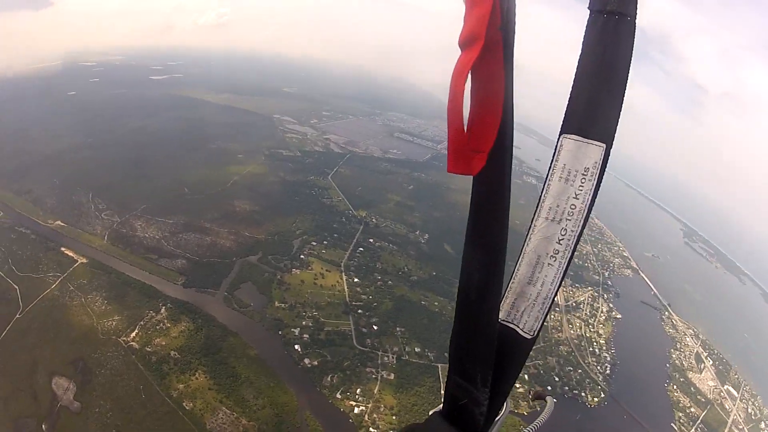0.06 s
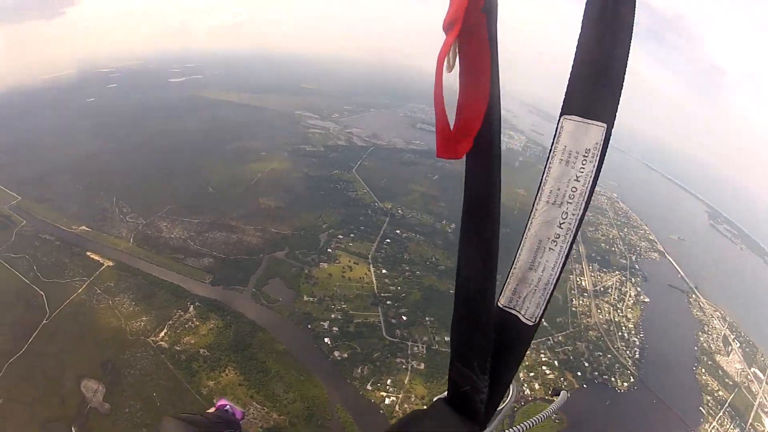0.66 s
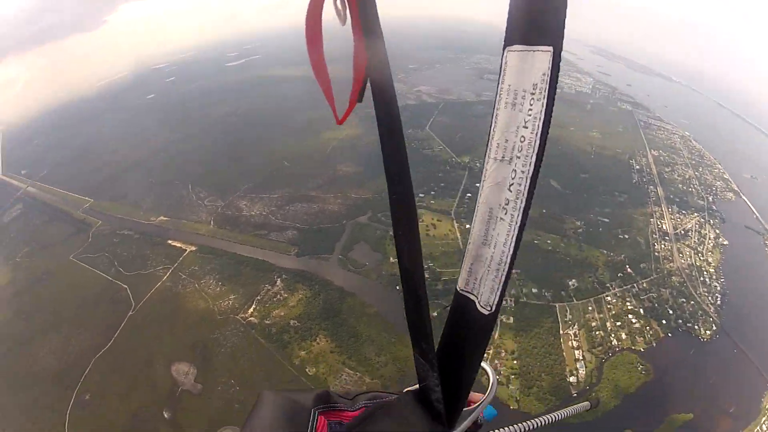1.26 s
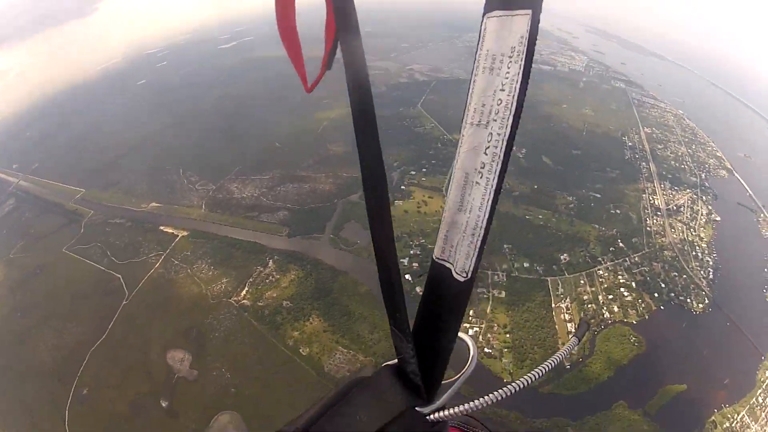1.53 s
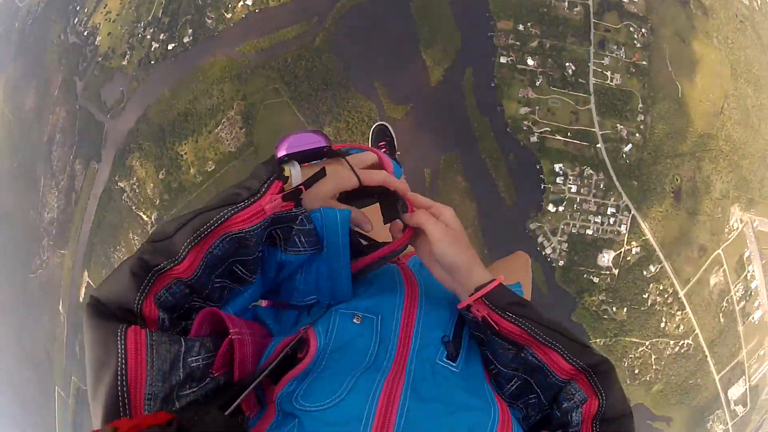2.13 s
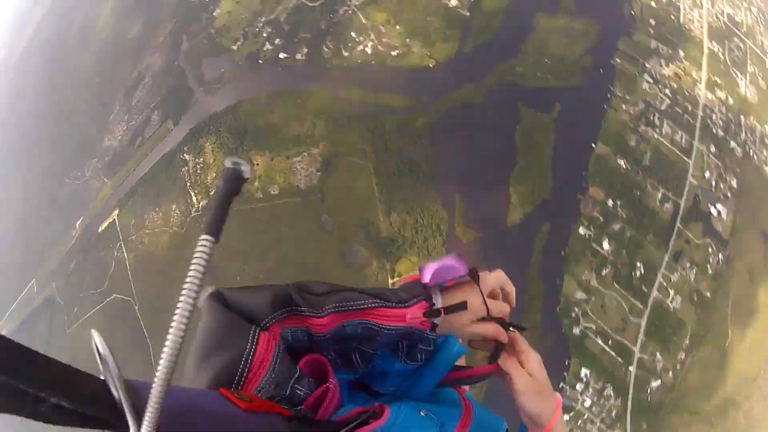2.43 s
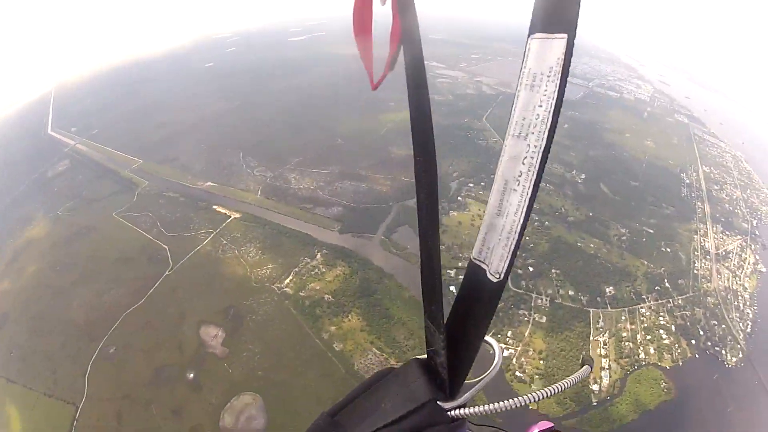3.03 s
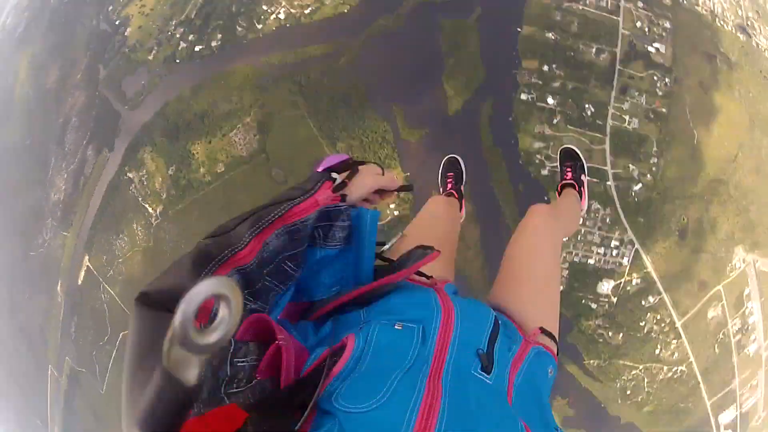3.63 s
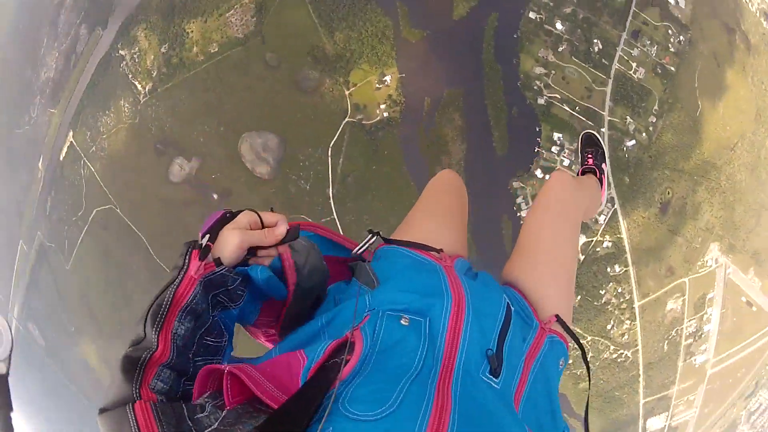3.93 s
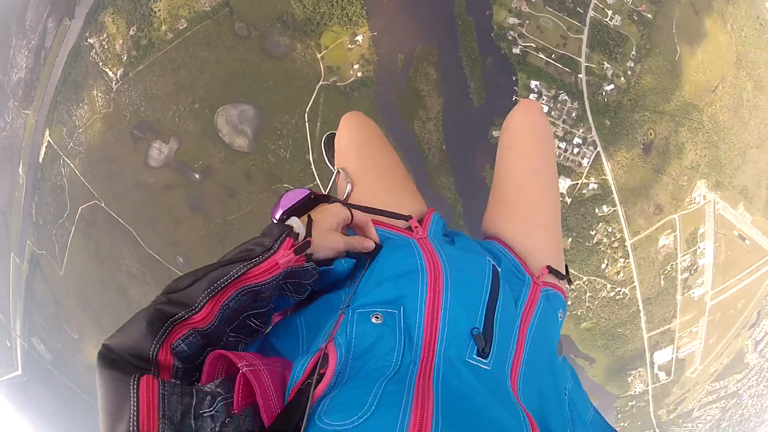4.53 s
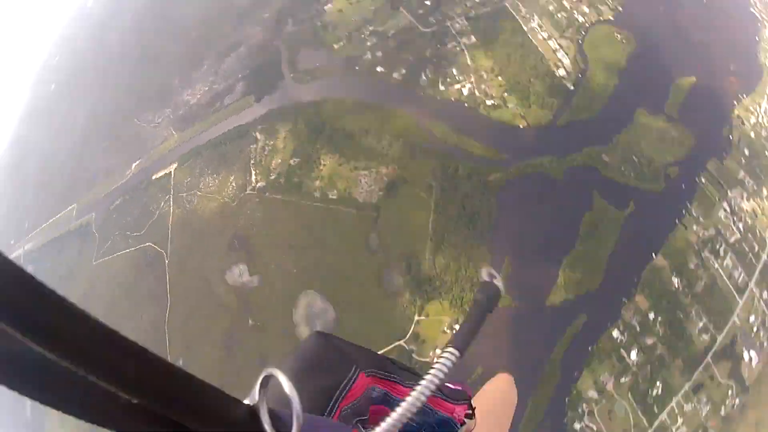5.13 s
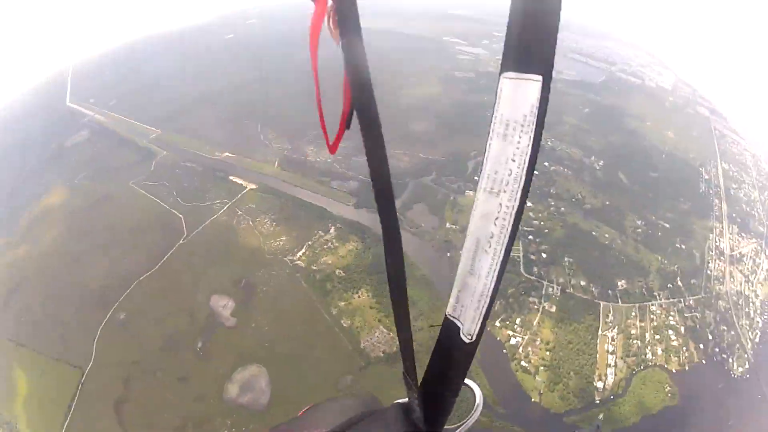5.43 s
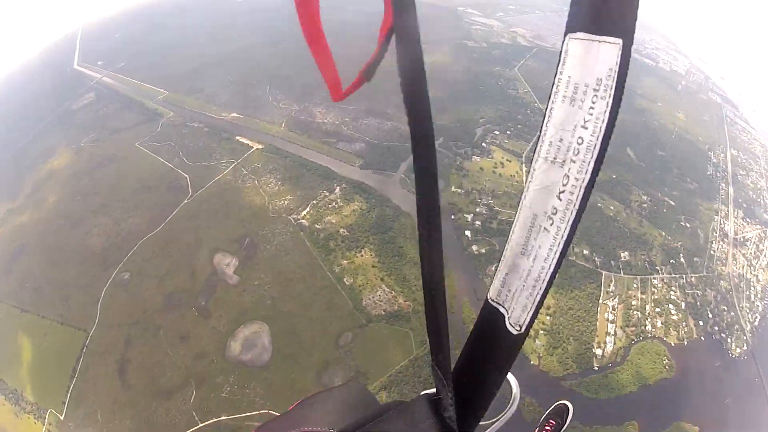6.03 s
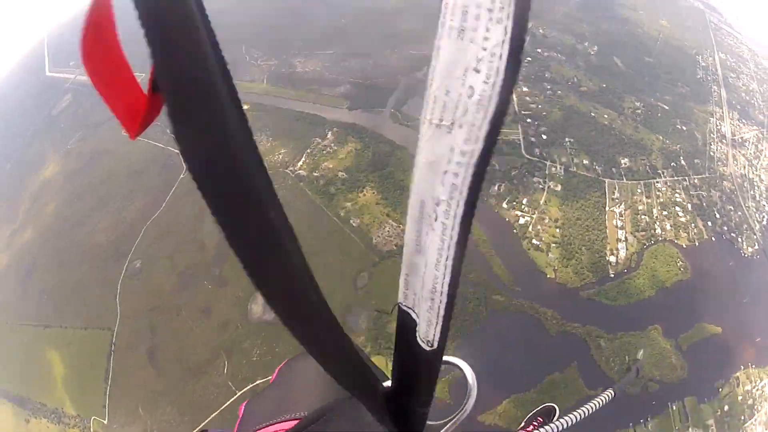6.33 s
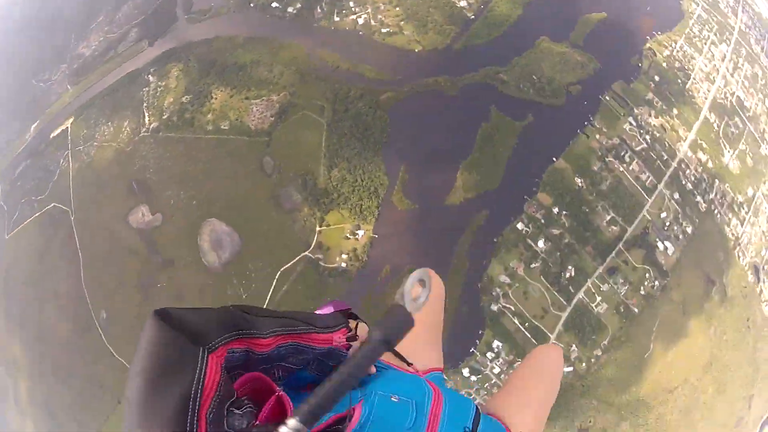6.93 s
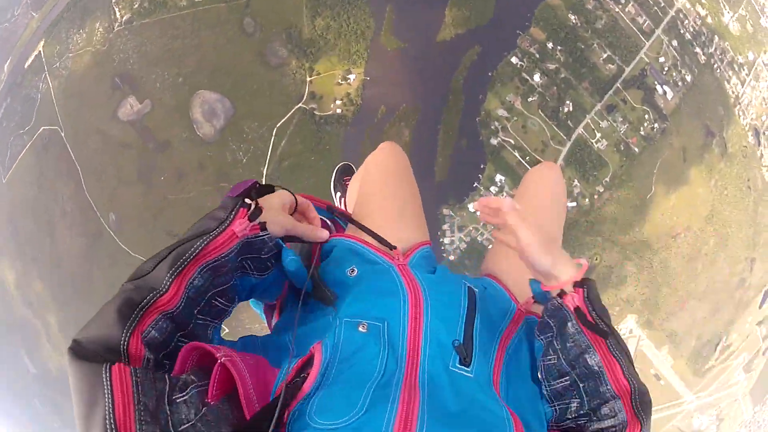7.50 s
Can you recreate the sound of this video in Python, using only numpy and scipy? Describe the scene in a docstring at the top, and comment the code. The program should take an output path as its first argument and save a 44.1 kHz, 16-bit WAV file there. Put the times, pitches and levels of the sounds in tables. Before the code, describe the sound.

Rushing air and rustling cloth during a parachute glide, with webbing scrapes, small metal clicks, plastic knocks and low buffeting gusts.

```python
"""Gliding under a parachute, heard from inside the plastic case of a helmet camera.
At first air rushes over the case, cloth rustles in the flow and gusts rumble underneath.
From 1.6 s the head moves: riser webbing scuffs the helmet and small metal parts click now and then.
From 4.3 s harness hardware knocks on the helmet, rattling the case and rocking it on its mount.
Big eddies buffet the helmet from 5.7 to 6.6 s; a few last knocks and low thumps follow."""
import sys
import numpy as np
from scipy import signal
from scipy.fft import rfft, irfft
from scipy.io import wavfile
from scipy.ndimage import uniform_filter1d, map_coordinates

SR = 44100
rng = np.random.default_rng(int(sys.argv[2]) if len(sys.argv) > 2 else 0)


def materialize(psi):
    """Save the field psi as 16-bit PCM at rate SR to the path in sys.argv[1].

    A 1-D psi becomes a single channel; in a 2-D psi each row is a channel.
    """
    bounded = np.clip(np.atleast_2d(psi).T, -1, 1)
    quanta = np.round(bounded * 32767).astype(np.int16)
    wavfile.write(sys.argv[1], SR, quanta)


N = 342216
HIT_SIZE = 8192  # samples in a one-shot
TIME = np.arange(N) / SR
AGE = np.arange(HIT_SIZE) / SR

# airflow, strong with the head up beside the risers, weak looking down: (time [s], level [dB])
AIRFLOW = [(0.0, -47), (0.15, -49.5), (0.39, -50), (0.84, -48.5), (1.1, -47.5), (1.42, -53), (1.9, -48),
           (2.12, -54.5), (2.4, -53), (2.68, -45), (3.46, -48), (3.76, -53), (4.06, -52), (4.28, -47.5),
           (4.47, -54.5), (4.65, -54.5), (5.14, -53), (5.3, -50.5), (5.86, -46), (5.94, -46.5),
           (6.35, -44.5), (7.76, -54)]
# treble that the case walls let through: (frequency [Hz], gain [dB])
WALL_EQ = [(5700, 0), (6050, -11), (6400, 1), (7700, 3.5), (8600, 10.5), (9400, 12), (10100, 18.5),
           (10900, 7), (11500, 2), (12600, -44), (13200, 12), (14000, 16.5), (15000, 6), (15600, 1)]


def buffeting(calm_db=-42, churn_db=2, swell_s=0.0047, throb_db=-9.5):
    """Turbulence rumbles in the case; each large eddy pushes it through a few slow swings."""
    # gusts swelling around the helmet: (middle [s], length [s], level [dB])
    gusts = [(.45, .6, -41), (1.8, 0.28, -34), (2.4, 0.065, -32.5), (3.05, 1.84, -43), (3.72, 0.42, -32),
             (4.7, .85, -34.5), (5.78, 0.32, -29), (6.33, 0.98, -25.5), (6.73, 0.11, -24.5),
             (6.9, 0.31, -35), (7.23, 0.11, -33.5), (7.62, 1.1, -36)]
    # large eddies hitting the case: (time [s], peak [dB], pitch [Hz])
    eddies = [(5.727, -20, 137), (5.791, -15.5, 76.6), (6.065, -14, 81), (6.209, -14, 117),
              (6.242, -11, 99.4), (6.355, -9, 73), (6.386, -2.5, 74.6), (6.504, -7, 117.4), (6.533, -9, 91),
              (6.568, -13.5, 122)]
    # tone of the rumble: (frequency [Hz], gain [dB])
    rumble_eq = [(15, -17), (30, -2.5), (50, -9), (70, 1), (95, -7), (130, -1.5), (160, -9.5), (200, -17.5),
                 (300, -30), (600, -36), (2000, -84)]
    gust_db = swells(gusts, calm_db)
    rumble = unit(colour(rng.standard_normal(N), rumble_eq)) * undb(gust_db + churn_db * walk(20))
    push = (AGE / swell_s) ** 2 * np.exp(-AGE / swell_s)
    for s, db, hz in eddies:
        add(rumble, s, peak(push * np.sin(2 * np.pi * hz * AGE), db))
    # the slowest pressure swings leak out of the case, leaving only a faint deep throb
    throb = unit(cut(rng.standard_normal(N), 41, "lowpass")) * undb(gust_db + throb_db)
    return cut(rumble, 35, "highpass") + throb


def knocks(chatter_db=-6, chatter_s=0.0024, rattle_db=-26, rattle_s=0.022, ring_db=-29, tick_db=-6.5):
    """Hardware hits the helmet, chatters for a few ms, rings the case and leaves it rattling briefly."""
    out = np.zeros(N)
    chatter = undb(chatter_db) * np.exp(-AGE / chatter_s) + undb(rattle_db) * np.exp(-AGE / rattle_s)
    for s, low_db, high_db in contacts():
        force = chatter * grains(HIT_SIZE, per_s=9000, spread_db=3)
        force[0] += 1  # the blow itself
        # tone of a hard knock: (frequency [Hz], gain [dB])
        knock_eq = [(100, -2), (450, -11.5), (650, -4.5), (900, 4.5), (2000, -7), (3200, -7), (4200, -30.5),
                    (7000, -30), (10000, -26), (16000, -26)]
        body = through_walls(ring_case(force, ring_db), knock_eq)
        # the hardness of the contact sets the share of low modes, high modes and tick
        low = burst(cut(body, 1380, "lowpass"), low_db)
        high = burst(cut(body, [1450, 4200], "bandpass"), high_db)
        tick = burst(cut(body, 4200, "highpass"), high_db + tick_db)
        add(out, s, low + high + tick)
    return out


def contacts(bounce_s=0.0106, bounce_spread=1.42, bounce_db=-14):
    """Each blow of the hardware; the hardest ones bounce softly at widening gaps."""
    # blows on the helmet: (time [s], low modes [dB], high modes [dB], bouncing time [s])
    blows = [(4.2963, -15, -20.5, .06), (4.7461, -22.5, -25.5, 0), (4.776, -16, -20, .06),
             (4.9051, -37.5, -35, 0), (5.1406, -30, -21.5, 0), (5.147, -31.5, -27, 0),
             (6.841, -30.5, -25.5, 0), (6.8445, -23, -20, 0), (7.542, -24.5, -30.5, 0)]
    for s, low_db, high_db, bouncing_s in blows:
        yield s, low_db, high_db
        for delay in bounce_s * np.arange(1, 6) ** bounce_spread:
            if delay < bouncing_s:
                yield s + delay, low_db + bounce_db, high_db + bounce_db


def ring_case(force, ring_db, scatter_db=1, detune=0.012):
    """A contact plus the case's ring; each point of contact loads and excites the modes its own way."""
    # modes of the case and mount: (frequency [Hz], t60 [s], relative level [dB])
    modes = [(634, 0.075, -10.5), (750, 0.022, -9), (863, 0.033, -3), (1040, 0.014, -7),
             (1153, 0.049, -5.5), (1246, 0.069, -13), (1645, 0.028, -2), (1920, 0.025, 6), (2066, 0.019, 4),
             (2310, 0.026, -4), (2400, 0.034, -22), (2940, 0.037, -4), (3060, 0.018, -26), (3690, 0.031, 2)]
    hz, t60, mode_db = np.transpose(modes)[:, :, None]
    load, share = rng.standard_normal((2, len(hz), 1))
    fade = undb(mode_db + scatter_db * share) * np.exp(-np.log(1000) * AGE / t60)
    ring = np.sum(fade * np.cos(2 * np.pi * hz * (1 + detune * load) * AGE), axis=0)
    return force + undb(ring_db) * signal.fftconvolve(force, ring)[:HIT_SIZE]


def thumps(rise_s=0.0029, decay_s=0.014):
    """The camera's mass swings on its springy mount and settles."""
    # jolts of the mount: (time [s], peak [dB], pitch [Hz])
    jolts = [(4.298, -16, 110), (4.325, -22.5, 124), (4.746, -13, 125), (4.783, -16.5, 113),
             (5.155, -24, 83.4), (6.855, -29, 94), (7.543, -14, 129), (7.725, -11, 88), (7.742, -11, 85)]
    out = np.zeros(N)
    envelope = (1 - np.exp(-AGE / rise_s)) * np.exp(-AGE / decay_s)
    for s, db, hz in jolts:
        add(out, s, peak(envelope * np.sin(2 * np.pi * hz * AGE), db))
    return out


def scuffs(scrape_trim_db=1.4, thud_trim_db=0.5, rise_share=0.36, drag_db=-22, drag_s=0.03):
    """Webbing lets go and drags its weave over the shell in tiny slips; the shortest scuffs snap."""
    # strongest scuffs, before the trims: (time [s], level [dB], thud offset [dB], slip decay [s])
    strong_scuffs = [(1.731, -34, -4.5, 0.013), (1.888, -36.5, -2, 0.0079), (2.085, -34.5, -12, 0.016),
                     (2.109, -34.5, -20, .0045), (2.4538, -40.5, -32, .0023), (2.4756, -29.5, -7, 0.0036),
                     (2.641, -30, 0, 0.01), (2.833, -36, -1.5, .007), (2.857, -28, -6, 0.0085),
                     (3.083, -25.5, -4.5, 0.015), (3.286, -29.5, 2, 0.0084), (3.421, -33.5, -5.5, 0.013),
                     (3.589, -37.5, 4.5, .008), (3.661, -35, -2, 0.011), (4.109, -36, -17, 0.0054),
                     (4.391, -39.5, -3.5, .009), (5.028, -36.5, -14, 0.0063), (5.218, -34.5, 2, .006),
                     (5.236, -36.5, -3, 0.0075), (5.4279, -26, -8, 0.0011), (5.59, -20, -4.5, 0.0032),
                     (5.742, -34, 2.5, 0.0076), (5.899, -30.5, -2, .005), (6.037, -30, -3, 0.0022),
                     (6.187, -27.5, 2.5, 0.0018), (6.335, -29.5, -4, 0.019), (6.499, -32, -5, 0.001),
                     (6.807, -29, -1.5, 0.0033), (6.876, -32.5, -7, 0.0071), (6.967, -33.5, -2.5, .007),
                     (6.9911, -26.5, -2.5, 0.003), (7.314, -38, -3.5, 0.015), (7.471, -34, -3, 0.0031),
                     (7.603, -35, -6.5, .005), (7.715, -33, 7, 0.023), (7.729, -28, -14, 0.0025)]
    # tone of the scrape: (frequency [Hz], gain [dB])
    scrape_eq = [(300, -2), (900, 2.5), (1450, 0.5), (1900, 9), (2400, 3.5), (3300, -3.5), (4300, -10),
                 (7000, -18), (16000, -19.5)]
    out = np.zeros(N)
    for s, db, thud_db, decay_s in strong_scuffs + light_scuffs():
        attack = 1 - np.exp(-AGE / (rise_share * decay_s))
        release = np.exp(-AGE / decay_s) + undb(drag_db) * np.exp(-AGE / drag_s)
        force = attack * release * grains(HIT_SIZE, per_s=6000, spread_db=3.15)
        scrape = through_walls(ring_case(force, ring_db=-38), scrape_eq)
        thud = strap_thud(force, s)
        add(out, s, burst(scrape, db + scrape_trim_db) + burst(thud, db + thud_db + thud_trim_db))
    return out


def light_scuffs(start_s=1.6, per_s=4, over_cloth_db=5.5, scatter_db=1, thud_db=0.5, decay_s=0.0094):
    """Once the head moves, webbing brushes it at uneven intervals, harder when the cloth is loud."""
    gap, softness = rng.random((60, 2)).T
    times = start_s + np.cumsum(2 * gap) / per_s
    levels = np.interp(times, TIME, cloth_level()) + over_cloth_db - scatter_db * (2 * softness - 1)
    return [(s, db, thud_db, decay_s) for s, db in zip(times, levels) if s < TIME[-1]]


def strap_thud(force, s, base_hz=482, octaves_per_db=0.09, scatter=0.24):
    """The taut strap thuds; looking down, out of the airflow, pulls it tighter and raises its pitch."""
    # body of the thud: (frequency [Hz], gain [dB])
    thud_eq = [(80, -5.5), (220, -1.5), (340, -4.5), (480, -9), (700, -2.5), (1000, -15.5), (1600, -25),
               (5000, -100)]
    flow_db = curve(AIRFLOW)
    shelter_db = flow_db.mean() - np.interp(s, TIME, flow_db)
    hz = base_hz * 2 ** (octaves_per_db * shelter_db) * np.exp(scatter * rng.standard_normal())
    return colour(force + 2 * band(force, hz, width_hz=220), thud_eq)


def rustle(trim_db=-0.5, flutter_db=1.5, crinkle_db=-11, patchy_db=3, swish_db=-7,
           echo_gain=0.35, echo_s=0.001303, sway_s=0.000212):
    """Cloth hisses in the flow, with patches of tiny crinkles; it brightens as it slides faster."""
    # tone of the cloth: (frequency [Hz], gain [dB])
    cloth_eq = [(100, -2), (350, -4.5), (700, -8.5), (1400, -5.5), (1900, 4.5), (2300, 1.5), (2800, -7.5),
                (3500, -11), (4300, -18), (7000, -24.5), (16000, -26.5)]
    cloth_db = cloth_level()
    crinkles = undb(crinkle_db + patchy_db * walk(9)) * grains(N, per_s=370, spread_db=4.5)
    hiss = rng.standard_normal(N) + crinkles
    hiss += undb(swish_db + cloth_db - cloth_db.mean()) * band(hiss, hz=3400, width_hz=2200)
    # a reflection off the swaying risers sweeps shallow notches through the sound
    lag = (echo_s + sway_s * walk(1.5)) * SR
    hiss += echo_gain * map_coordinates(hiss, [np.arange(N) - lag], order=1)
    return unit(through_walls(hiss, cloth_eq)) * undb(cloth_db + trim_db + flutter_db * walk(40))


def cloth_level(over_flow_db=2):
    """Envelope in dB: the cloth rustles with the airflow, and more while it slides."""
    # cloth sliding past the helmet as head and arms move: (middle [s], length [s], level [dB])
    slides = [(1.68, 0.31, -44), (2.32, 0.088, -46), (3.52, 0.28, -43), (4.2, 0.17, -53.5),
              (5.24, 0.34, -44), (5.65, 0.48, -46), (6.3, 0.25, -43.5), (6.94, 0.14, -47)]
    return swells(slides, curve(AIRFLOW) + over_flow_db)


def rush(level_db=-50, flow_follow=0.28, flicker_db=1):
    """Air blows over a hollow of the case; its midrange and the rest flicker apart."""
    # tone of the hollow: (frequency [Hz], gain [dB])
    hollow_eq = [(100, -23), (260, 0.5), (430, -8), (800, -7.5), (1000, -5.5), (1200, 3), (1500, -8.5),
                 (1850, -14), (2500, -32), (4000, -48), (16000, -52)]
    air = rng.standard_normal(N)
    mids = band(air, hz=880, width_hz=700)
    air = mids * undb(flicker_db * walk(19)) + (air - mids) * undb(flicker_db * walk(26))
    flow_db = curve(AIRFLOW)
    return unit(colour(air, hollow_eq)) * undb(level_db + flow_follow * (flow_db - flow_db.mean()))


def clicks(decay_s=0.0019):
    """Small metal parts touch and are damped at once by the webbing."""
    # light touches of metal: (time [s], level [dB])
    touches = [(2.455, -49), (2.477, -71), (3.656, -63), (3.674, -50), (4.567, -57), (4.706, -52.5),
               (5.189, -46), (7.172, -54.5)]
    # bright tone of a click: (frequency [Hz], gain [dB])
    metal_eq = [(300, -43), (1200, -50), (2200, -1.5), (3500, 11), (5000, 6), (7500, 3), (9000, -8),
                (16000, -20)]
    out = np.zeros(N)
    for s, db in touches:
        tap = rng.standard_normal(HIT_SIZE) * np.exp(-AGE / decay_s)
        add(out, s, burst(colour(tap, metal_eq), db))
    return out


def through_walls(x, eq):
    """Give a source its own tone, then pass it through the case walls."""
    return colour(colour(x, eq), WALL_EQ)


def undb(db):
    """Decibels to gain."""
    return 10 ** (np.asarray(db) / 20)


def unit(x):
    """Scale to rms 1."""
    return x / np.sqrt(np.mean(x ** 2))


def peak(x, db):
    """Scale to a peak level."""
    return x * undb(db) / np.abs(x).max()


def burst(x, db):
    """Scale a one-shot to the energy of 10 ms at the given level."""
    return x * undb(db) / np.sqrt(np.sum(x ** 2) / (0.01 * SR))


def curve(rows):
    """Join (time, value) rows by straight lines."""
    return np.interp(TIME, *np.transpose(rows))


def swells(rows, floor_db):
    """Envelope in dB of smooth swells over a floor."""
    power = undb(floor_db) ** 2
    for middle_s, length_s, db in rows:
        arch = np.cos(np.pi * np.clip((TIME - middle_s) / length_s, -0.5, 0.5))
        power = power + (undb(db) * arch) ** 2
    return 10 * np.log10(power)


def add(out, s, x):
    """Mix a one-shot in at time s."""
    i = max(int(s * SR), 0)
    out[i:i + len(x)] += x[:max(N - i, 0)]


def colour(x, eq):
    """Minimum-phase EQ through (frequency, gain) points."""
    hz, db = np.transpose(eq)
    grid_hz = np.maximum(np.arange(HIT_SIZE // 2 + 1) * SR / HIT_SIZE, 1)
    gain = undb(np.interp(np.log(grid_hz), np.log(hz), db))
    cepstrum = irfft(np.log(gain))
    # folding the cepstrum keeps the filter from ringing ahead of an attack
    cepstrum[1:HIT_SIZE // 2] *= 2
    cepstrum[HIT_SIZE // 2 + 1:] = 0
    impulse = irfft(np.exp(rfft(cepstrum)))
    return signal.fftconvolve(x, impulse)[:len(x)]


def band(x, hz, width_hz):
    """One resonance, gain 1 at the centre."""
    return signal.lfilter(*signal.iirpeak(hz, hz / width_hz, fs=SR), x)


def cut(x, hz, kind):
    """Steep low-, band- or high-pass."""
    return signal.sosfilt(signal.butter(4, hz, kind, fs=SR, output="sos"), x)


def walk(per_s):
    """Smooth random drift: sample-and-hold slewed twice, rms 1."""
    hold = int(SR / per_s)
    steps = np.repeat(rng.standard_normal(N // hold + 1), hold)
    return unit(uniform_filter1d(uniform_filter1d(steps, hold), hold)[:N])


def grains(size, per_s, spread_db):
    """Random tiny impacts of uneven strength, rms 1."""
    strength = undb(spread_db * np.minimum(rng.exponential(size=size), 4))
    fires = rng.random(size) < per_s / SR
    return unit(fires * rng.standard_normal(size) * strength)


def scene():
    """Wind and gear at one microphone; open air gives no reverb."""
    return (rush() + rustle() + buffeting() + knocks() + thumps() + scuffs() + clicks())[None]


def record(dry, whine_db=-35, whine_hz=12000, ceiling=0.75, top_hz=15300):
    """A faint, thin whine rides on the strongest rumble; the camera rounds peaks and cuts the top end."""
    rumble = band(dry, hz=120, width_hz=70)
    whine = undb(whine_db) * rumble * np.cos(2 * np.pi * whine_hz * TIME)
    rounded = dry / (1 + (dry / ceiling) ** 4) ** 0.25
    high_cut = signal.ellip(8, 0.2, 70, top_hz, fs=SR, output="sos")
    return signal.sosfilt(high_cut, rounded + whine)


dry = scene()
out = record(dry)
materialize(out)
```